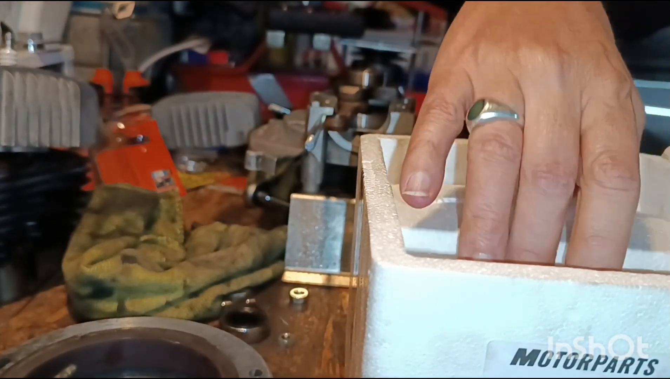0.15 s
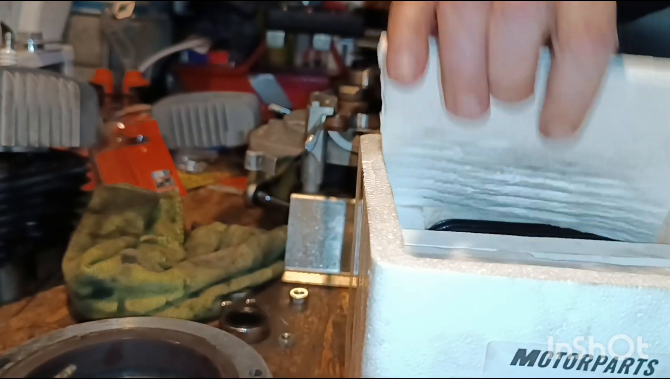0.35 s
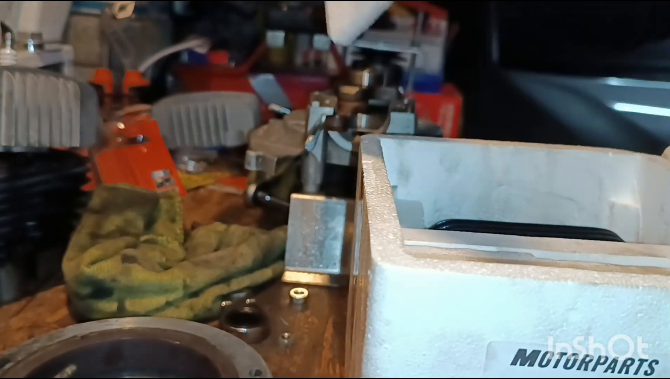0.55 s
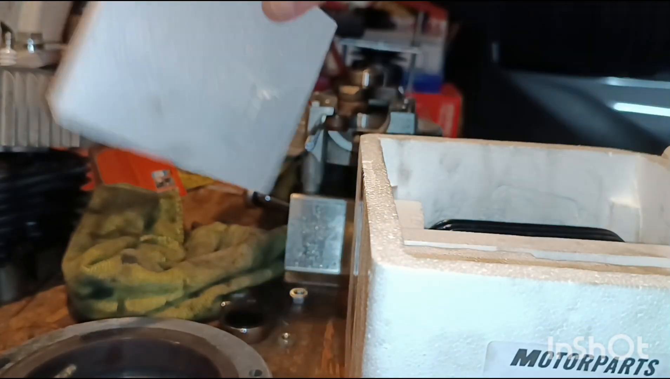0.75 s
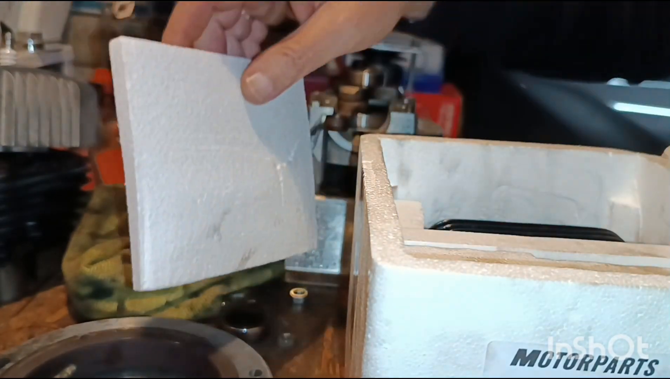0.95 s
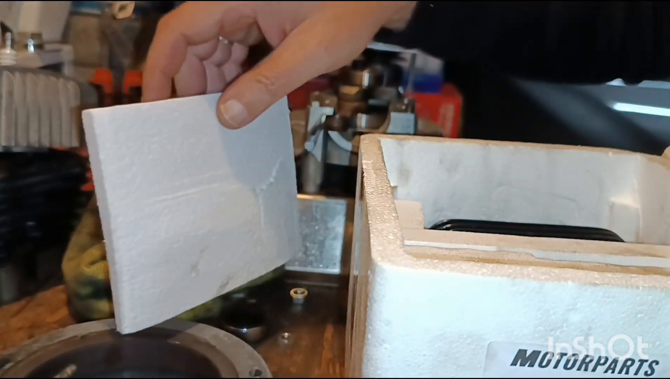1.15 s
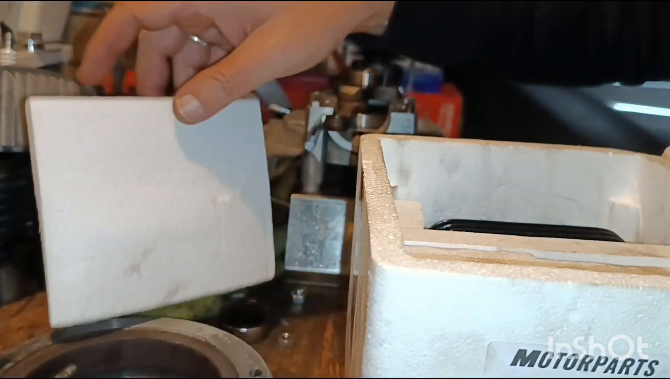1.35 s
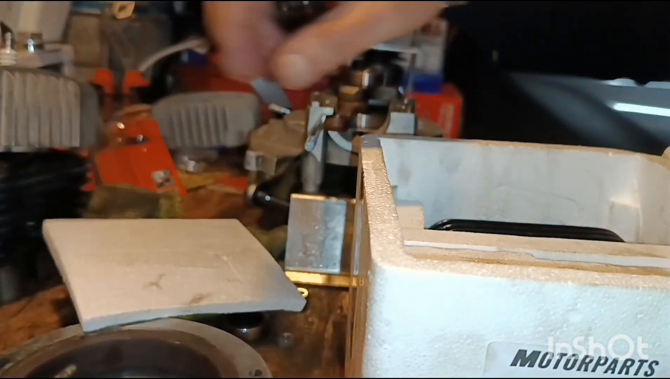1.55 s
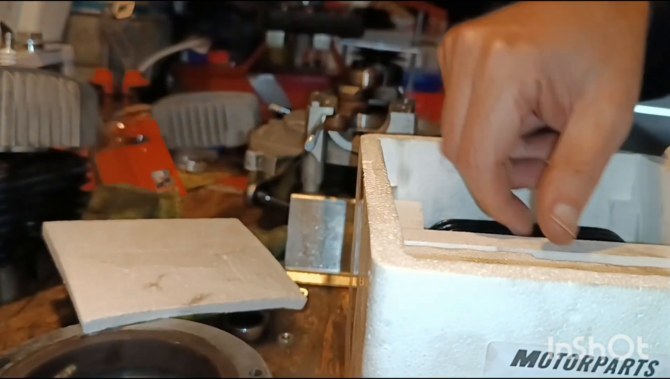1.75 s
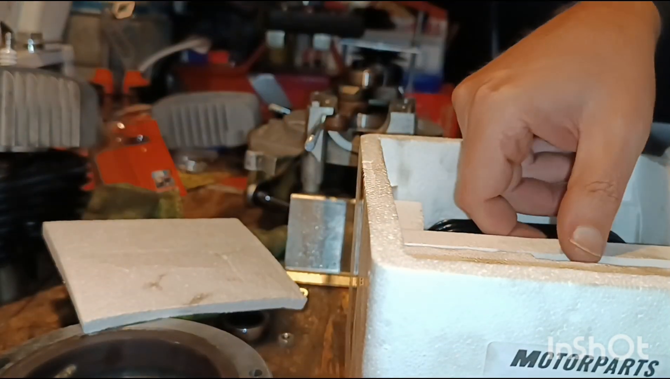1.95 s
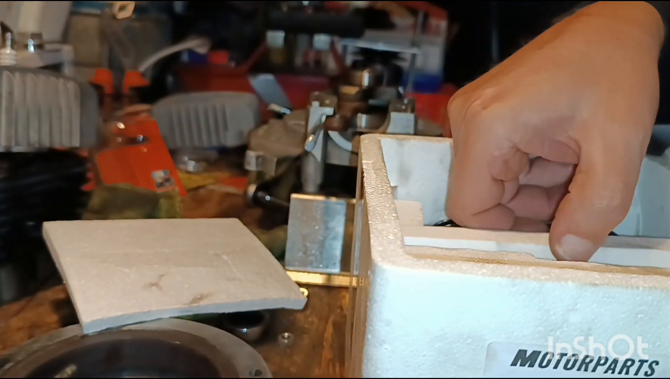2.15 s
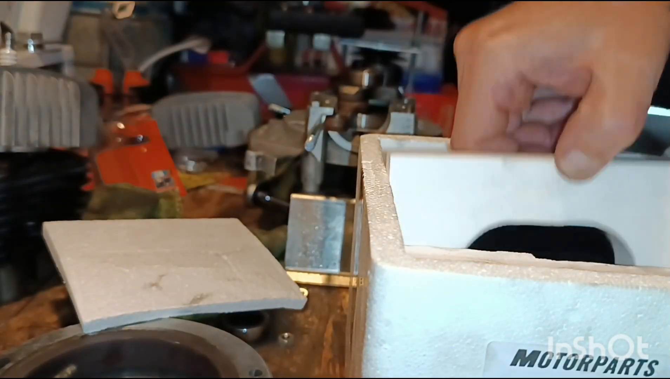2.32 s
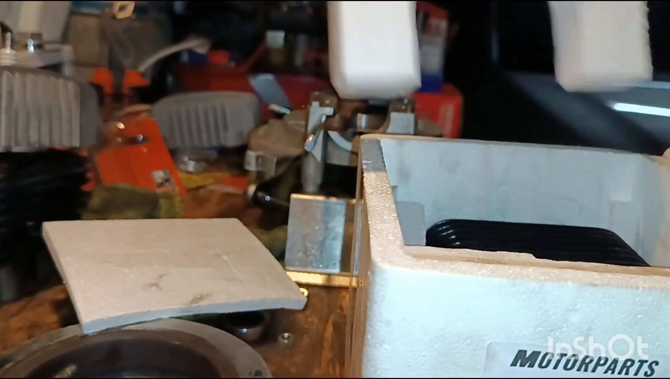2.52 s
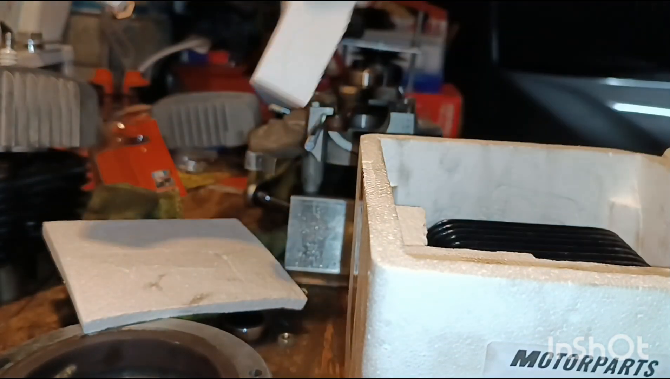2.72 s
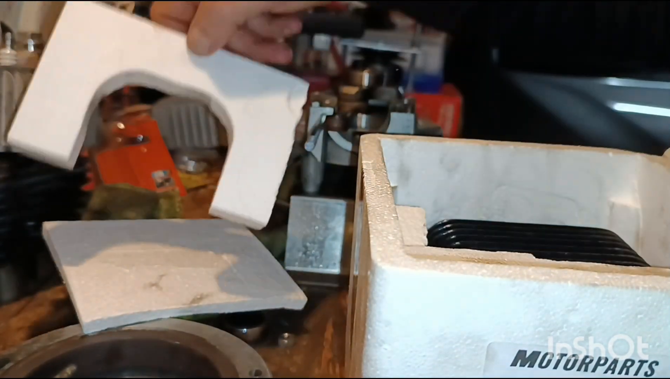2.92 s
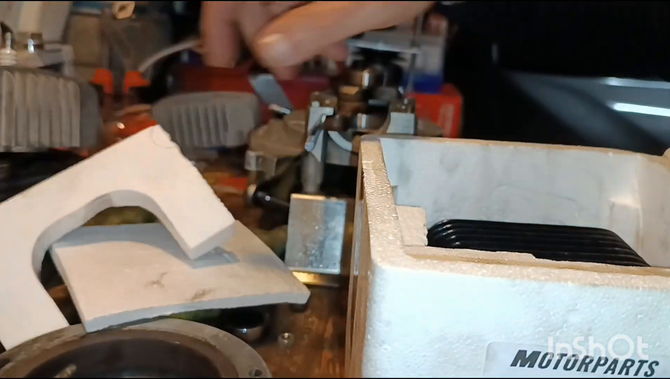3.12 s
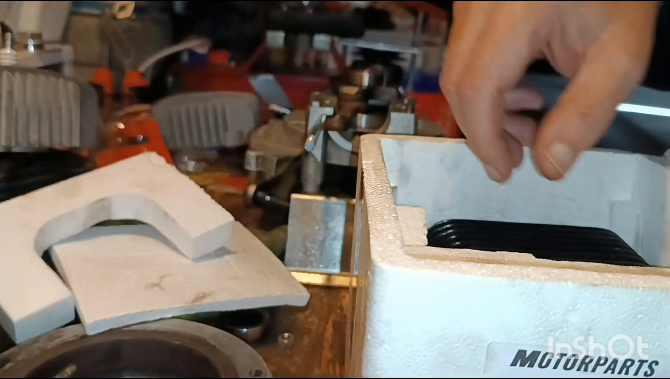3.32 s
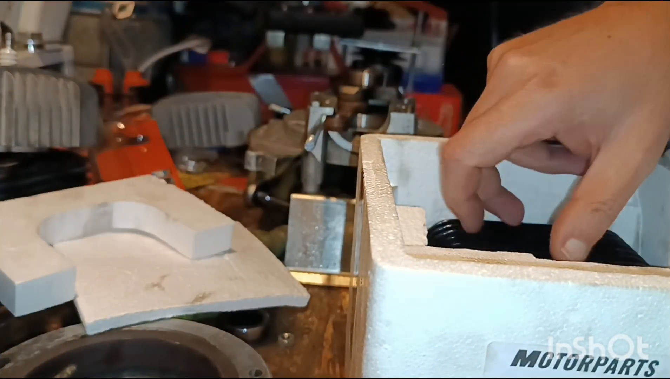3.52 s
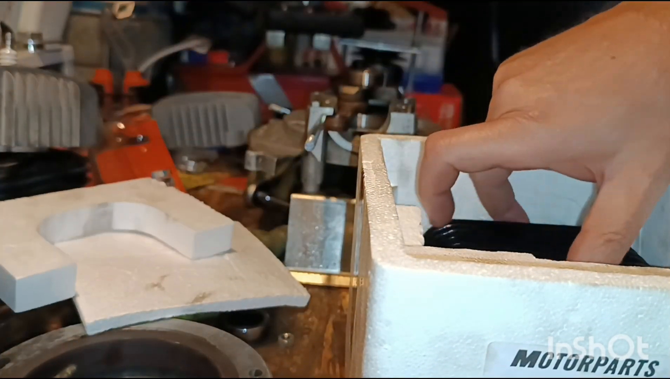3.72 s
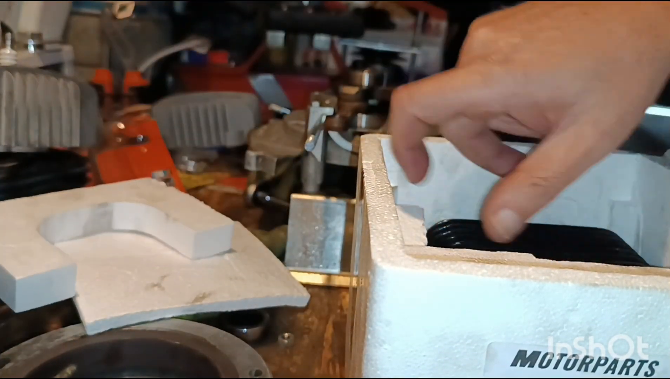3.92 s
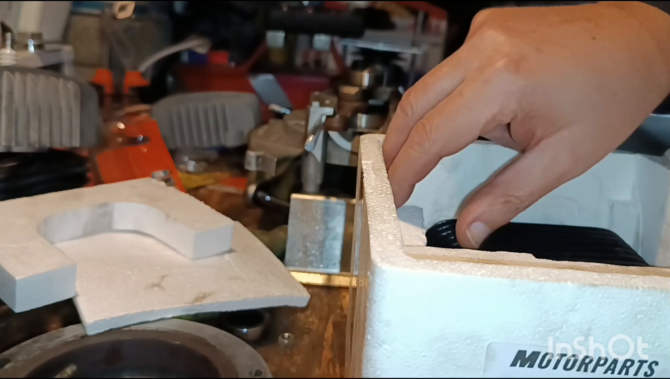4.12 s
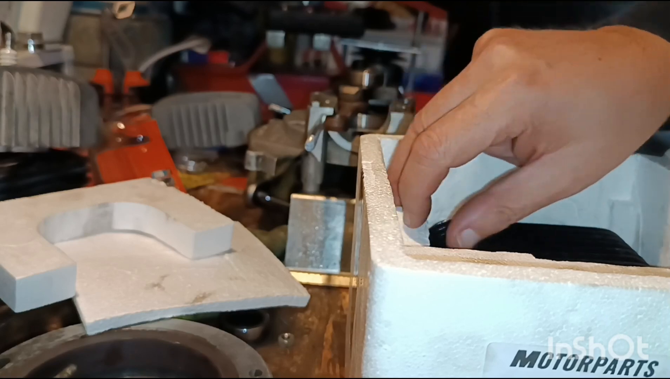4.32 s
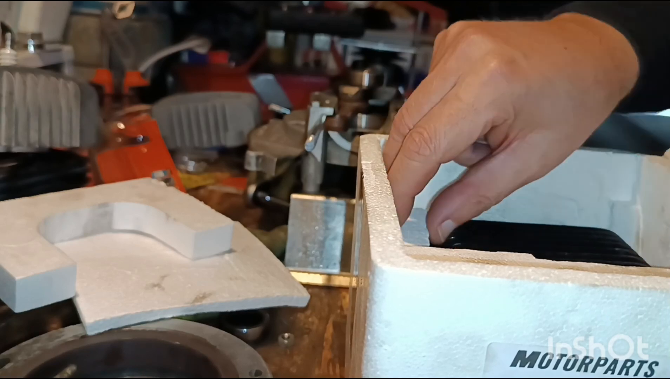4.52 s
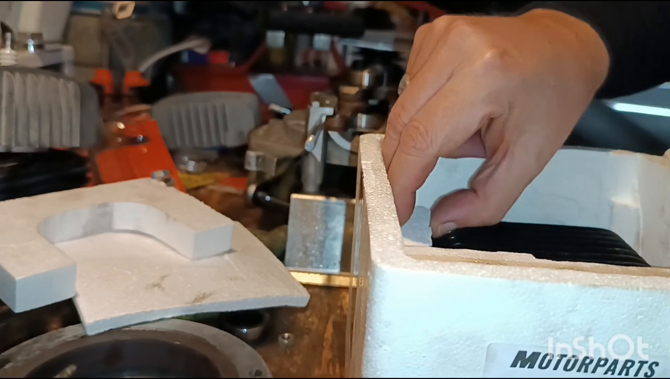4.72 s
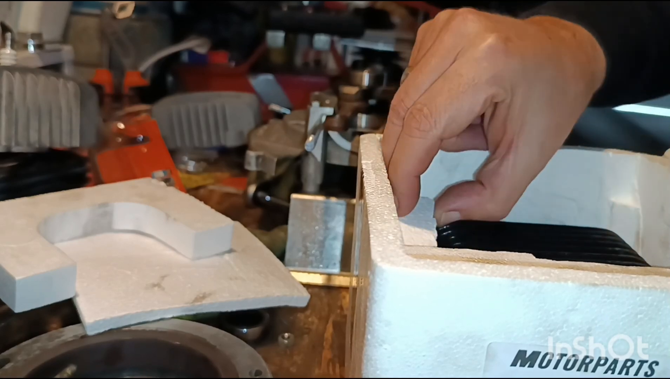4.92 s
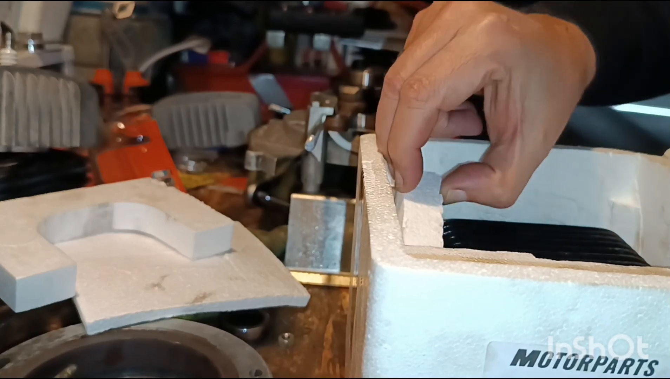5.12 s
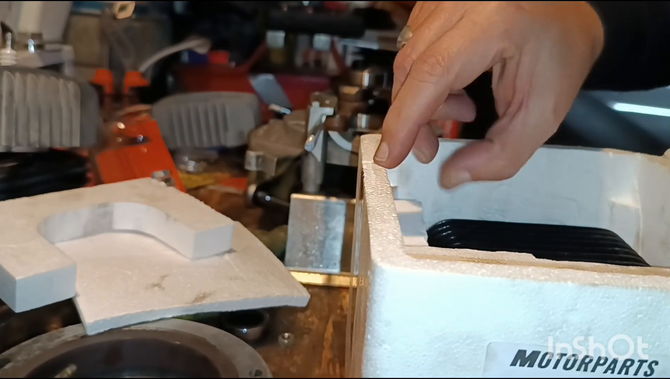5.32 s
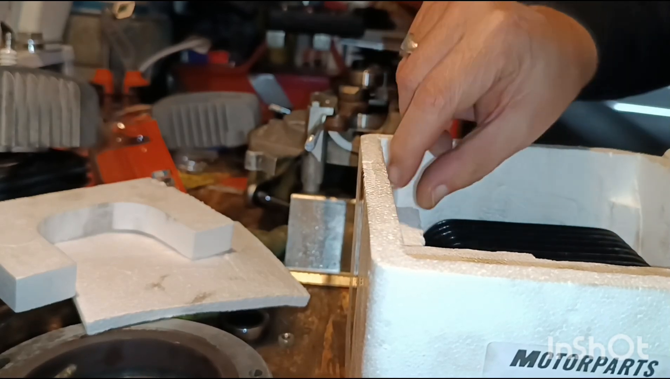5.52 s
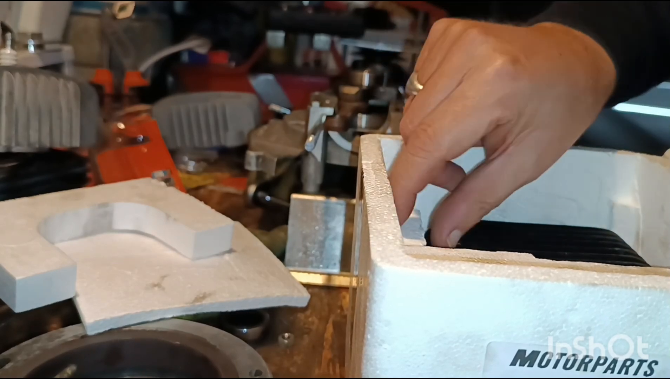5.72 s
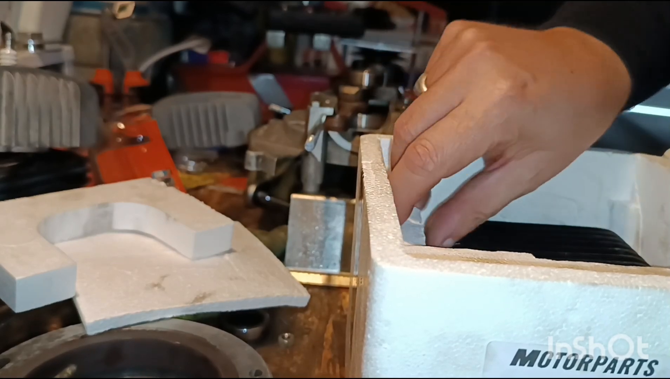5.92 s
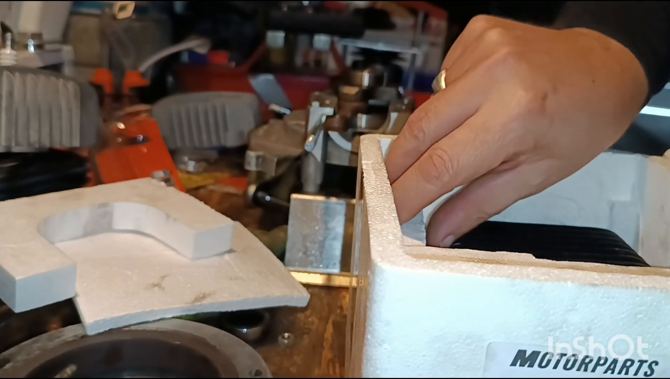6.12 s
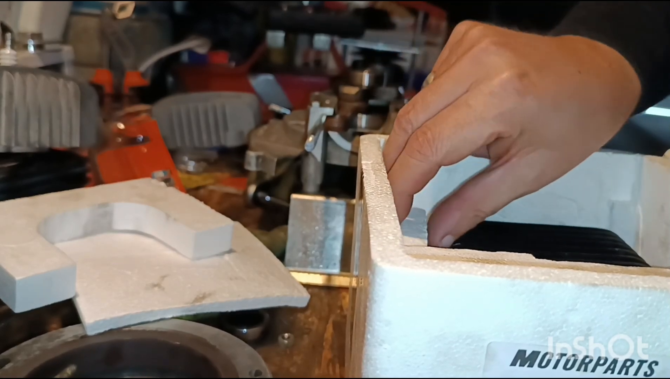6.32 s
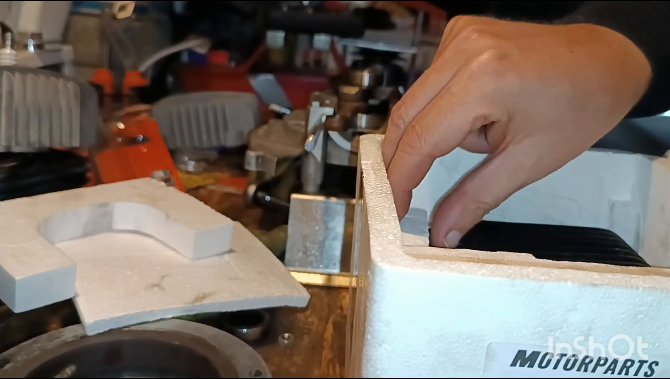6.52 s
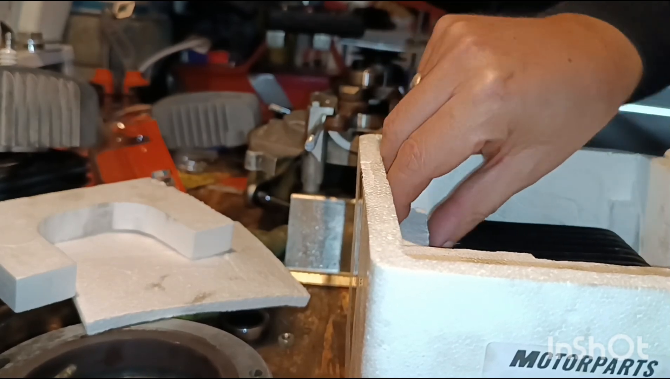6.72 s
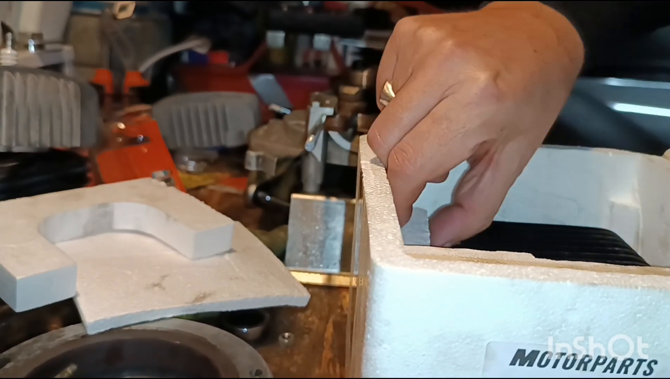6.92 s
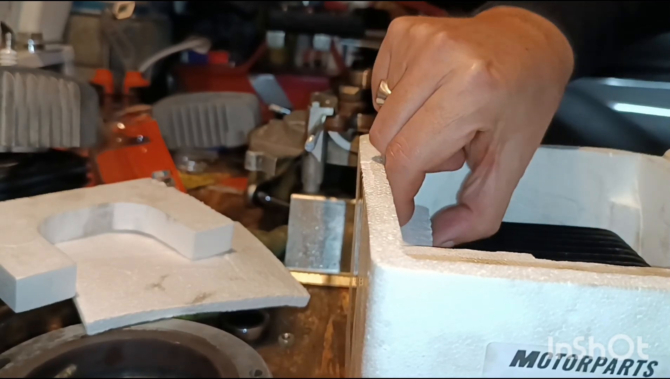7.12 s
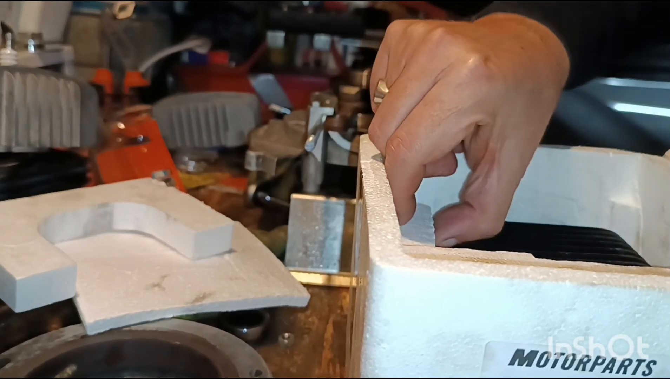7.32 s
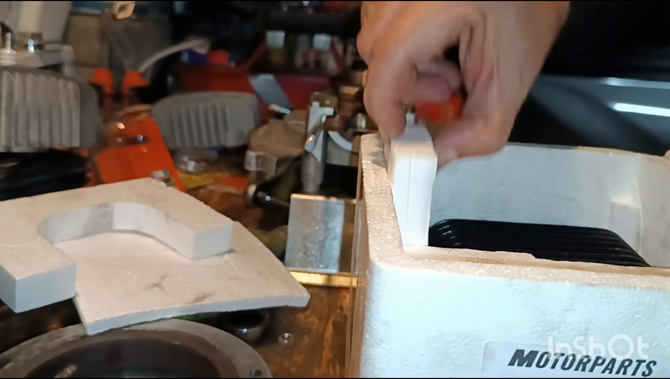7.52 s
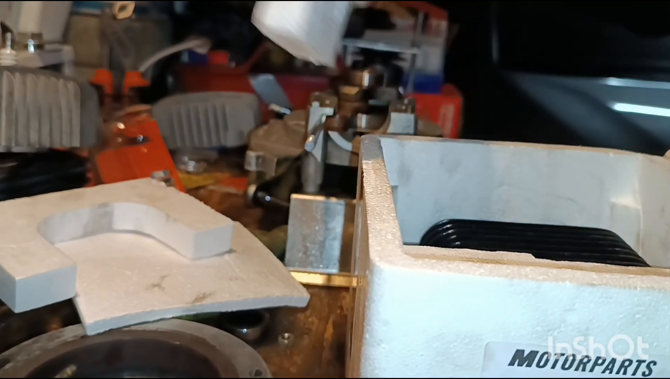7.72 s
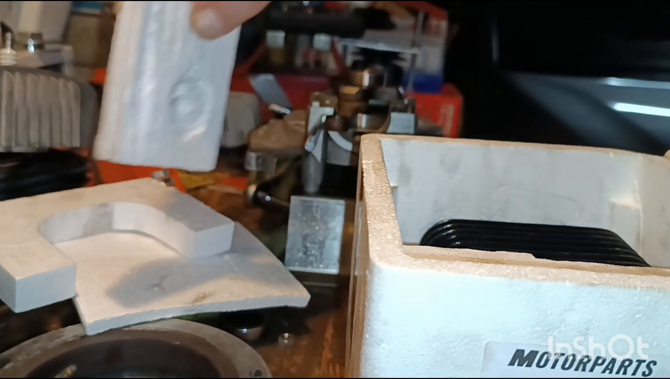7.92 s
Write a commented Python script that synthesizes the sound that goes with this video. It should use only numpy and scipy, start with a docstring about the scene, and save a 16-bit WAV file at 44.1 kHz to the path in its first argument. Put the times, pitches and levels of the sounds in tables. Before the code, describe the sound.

Foam scrapes and creaks against foam as fingers work pieces out of a box, and loose pieces land softly on a bench.

```python
"""Hands pull a foam piece out of a foam box in a workshop. Foam beads scrape on foam: they hiss,
the walls scratch and the hollow box booms. At 1.5 s a loose sheet drops on the bench. A second
piece squeaks as it is pulled out and lands at 3.1 s, and a metal part on the bench rings.
Fingers rub and tap the foam until a last long pull at 7.5 s. Behind it all the room
hisses faintly, traffic rumbles and a distant engine comes and goes."""
import sys
import numpy as np
from scipy import signal
from scipy.fft import rfft, irfft, next_fast_len
from scipy.io import wavfile

SR = 44100
rng = np.random.default_rng(int(sys.argv[2]) if len(sys.argv) > 2 else 0)


def to_wav(s):
    """Save 16-bit WAV."""
    ch = np.atleast_2d(s).T  # columns
    pcm = np.round(np.clip(ch, -1, 1) * 32767)  # PCM
    wavfile.write(sys.argv[1], SR, pcm.astype(np.int16))


N = 355248

# the notes at which the foam walls ring: (pitch [Hz], width [Hz], level [dB])
WALL_RINGS = [(1094, 106, 1.5), (1472, 142, 1.5), (1732, 270, -0.5), (2108, 278, 6), (2354, 510, 0.5),
              (2950, 277, -0.5), (3334, 238, -2.5), (4580, 1380, -17.5)]


def foam(scratch_follows_hiss=0.62):
    """Sliding, rubbing, pulling and tapping shake the beads, the walls and the air in the box."""
    # light steady touch of the hand: (time [s], bead hiss [dB], box boom [dB])
    sliding = [(0.0, -62.5, -62.5), (0.22, -62, -76), (0.38, -56, -36.5), (0.62, -69, -75),
               (1.79, -75.5, -69), (2.42, -43.5, -43), (2.78, -77, -79.5), (3.61, -69, -66.5),
               (4.03, -79, -64.5), (4.31, -48.5, -50), (4.75, -59.5, -58), (5.27, -67.5, -54),
               (5.47, -97, -62), (5.83, -57, -49), (7.44, -75, -63.5), (7.64, -60, -49), (7.85, -62, -81),
               (8.05, -78, -79)]
    # where the hand works: (time [s], left over right [dB])
    hand_position = [(0.0, -1), (1.5, 2.5), (2.5, -0.7), (3.1, 4.5), (4.0, 0.5), (6.0, -0.5), (7.8, -0.4)]
    # tone of the scraping beads: (frequency [Hz], level [dB])
    bead_tone = [(2350, -31.5), (4000, -2), (5610, -1.5), (6410, -5.5), (7190, -5), (8060, -7.5),
                 (11300, -3), (12500, 4.5), (15800, 0.5)]
    # the low notes of the box: (pitch [Hz], width [Hz], level [dB])
    box_rings = [(165, 55, -6.5), (300, 70.4, -0.5), (340, 48.6, 1), (457, 74, 1), (667.6, 84, -6),
                 (798, 370, -12)]
    # broad bands of a knock that hardly rings: (centre [Hz], width [Hz], level [dB])
    knock_bands = [(1130, 880, 0), (2280, 770, 0), (4100, 2300, -2)]
    hiss_db, boom_db = in_time(sliding)
    scratch_db = 1.5 + scratch_follows_hiss * hiss_db + (1 - scratch_follows_hiss) * boom_db
    rub_hiss, rub_scratch, creak, rub_boom = rubs()
    pull_hiss, pull_scratch, pull_boom, sheen_db = pulls()
    (crack, dull_knock, bright_knock, tap_boom), tap_notes = taps()
    # beads catch and let go, so the force shakes at two speeds
    judder = from_db(drift(21) + 0.74 * drift(150) - 2)
    hiss = (rub_hiss + pull_hiss + stereo_noise(alike=0.055) * from_db(hiss_db)) * judder + crack
    scratch = (rub_scratch + pull_scratch + stereo_noise(alike=0.064) * from_db(scratch_db)) * judder
    walls = ring(scratch + from_db(-22.5) * dull_knock, WALL_RINGS)
    boom_force = (rub_boom + from_db(-5.5) * pull_boom + from_db(boom_db)) * judder
    boom = stereo_noise(alike=0.43) * boom_force
    boom *= from_db(3.22 * drift(31) - 2.5)   # the box is pushed in separate lumps
    click = np.r_[1., np.zeros(N - 1)]
    beads = colour(hiss, bead_tone) / np.sqrt(np.sum(colour(click, bead_tone) ** 2))
    sheen = colour(beads, [(8000, -30), (12500, 0), (16000, -3)])   # the highest part of the hiss
    knocks = (ring(dull_knock, knock_bands[:1]) + ring(bright_knock, knock_bands[1:])) / np.sqrt(2)
    surface = beads + (from_db(sheen_db) - 1) * sheen + walls + creak * judder + from_db(-2.5) * knocks
    # sliding makes the air in the box sing one note
    air_push = stereo_noise(alike=0.76) * (pull_boom + from_db(boom_db - 11))
    air_note = from_db(-4) * ring(air_push, [(455.4, 36.6, 0)])
    box = ring(boom + tap_boom, box_rings) + air_note + tap_notes
    return surface * left_right(in_time(hand_position)[0]) + box


def pulls(edge_s=0.038, resting_sheen_db=-8.0):
    """A piece scrapes out of its tight seat; the highest hiss, its sheen, grows until it comes free."""
    # one list for each pull: (time [s], bead hiss [dB], wall scratch [dB], box boom [dB])
    scrapes = [
        [(0.2, -62, -68, -58), (0.212, -46.5, -46.5, -36.5), (0.276, -48.5, -52, -60), (0.296, -41, -41, -38),
         (0.316, -40.5, -55, -49), (0.366, -42.5, -44.5, -41), (0.434, -33, -42, -47), (0.46, -37.5, -47, -32),
         (0.466, -38, -35.5, -25.5), (0.528, -44, -56, -60), (0.54, -77, -60, -58)],
        [(2.27, -41, -56, -37.5), (2.302, -40, -49, -57), (2.346, -36, -44.5, -44), (2.432, -39, -52, -43.5),
         (2.446, -36, -47, -42), (2.472, -33, -41.5, -30.5), (2.498, -32.5, -39, -36), (2.516, -37, -43, -35),
         (2.53, -45, -56, -49), (2.55, -41, -58, -46.5), (2.562, -35, -52, -26.5), (2.576, -48, -73, -41)],
        [(7.45, -67, -50.5, -44), (7.464, -34, -36, -38), (7.478, -28.5, -39, -45.5), (7.512, -33, -45.5, -41),
         (7.534, -30.5, -34.5, -51), (7.552, -32, -36, -28), (7.566, -29.5, -43, -37.5), (7.58, -36, -37, -34),
         (7.606, -36, -44, -52), (7.644, -30.5, -41.5, -40.5), (7.672, -31, -42, -37.5),
         (7.686, -30, -40.5, -30), (7.71, -28, -40, -28.5), (7.728, -27, -38, -24.5), (7.742, -68, -56, -41)],
    ]
    middle_sheen_db, sheen_rise_db = (-5.5, 1, -3.5), (7, 16.5, 8)
    t = np.arange(N) / SR
    levels, sheen_db = np.zeros((3, N)), np.full(N, resting_sheen_db)
    for rows, middle_db, rise_db in zip(scrapes, middle_sheen_db, sheen_rise_db):
        start, end = rows[0][0], rows[-1][0]
        fade = np.clip(np.minimum(t - start, end - t) / edge_s + .5, 0, 1)
        levels += fade * from_db(in_time(rows))
        along = (t - start) / (end - start) - .5
        sheen_db += fade * (middle_db + rise_db * along - resting_sheen_db)
    grains = box_echoes(bead_noise(snap_db=12)[:N]) + rng.standard_normal((2, N))
    grains *= from_db(1.3 * drift(65))   # the tight fit sticks and slips
    hiss, scratch, boom = levels
    return grains * hiss, grains * scratch, boom, sheen_db


def rubs(edge_s=0.0086, edge_share=0.25, arch_db=2.0, fade_db=-0.5, creak_width_hz=111):
    """Each short finger rub scrapes the beads and creaks at one of the wall's notes."""
    # finger rubs: (time [s], length [s], bead hiss [dB], wall scratch [dB], box boom [dB])
    strokes = [(0.182, 0.046, -59, -56, -47), (0.566, 0.034, -48, -50.5, -58),
               (0.669, 0.061, -49, -56, -84), (0.764, 0.085, -55, -62, -70),
               (0.826, 0.048, -48, -59.5, -74), (0.967, 0.03, -59, -60, -78),
               (1.025, 0.062, -54.5, -52, -62.5), (1.095, 0.15, -56, -57, -64.5),
               (1.28, 0.09, -63.5, -69, -80), (1.861, 0.032, -45.5, -51.5, -45),
               (1.937, 0.032, -58, -53.5, -67), (1.971, 0.096, -49.5, -51, -54.5),
               (2.086, 0.068, -57, -52.5, -50.5), (2.212, 0.045, -53, -76, -71),
               (2.613, 0.041, -56, -53, -82), (2.666, 0.018, -52, -62, -58),
               (2.697, 0.055, -61.5, -64.5, -65), (2.991, 0.031, -64.5, -71, -99),
               (3.073, 0.051, -40, -49, -45.5), (3.141, 0.069, -42, -47.5, -47),
               (3.214, 0.03, -48.5, -52, -50.5), (3.48, 0.062, -57.5, -58.5, -66),
               (3.555, 0.081, -52.5, -57, -66), (3.633, 0.089, -59.5, -60, -57.5),
               (3.709, 0.072, -48, -51, -47), (3.851, 0.035, -64, -59, -59),
               (3.892, 0.031, -44.5, -46, -48), (4.073, 0.045, -44, -46.5, -49.5),
               (4.138, 0.025, -43, -42, -34.5), (4.192, 0.023, -46, -51, -46),
               (4.22, 0.073, -39.5, -45, -45), (4.329, 0.041, -35.5, -40.5, -56),
               (4.388, 0.03, -49, -48, -56), (4.424, 0.032, -47, -46.5, -45), (4.473, 0.013, -43, -57, -37),
               (4.507, 0.027, -49.5, -55, -54), (4.62, 0.068, -43.5, -48, -55),
               (4.768, 0.057, -43.5, -43.5, -50), (4.88, 0.047, -46.5, -46.5, -45),
               (4.907, 0.055, -33.5, -37.5, -44), (5.008, 0.077, -46.5, -44, -44.5),
               (5.081, 0.086, -33, -36, -44.5), (5.217, 0.043, -32, -33, -36.5),
               (5.257, 0.032, -25.5, -34, -38), (5.33, 0.019, -41, -50, -71), (5.361, 0.014, -43, -39, -42),
               (5.422, 0.038, -36, -43, -37.5), (5.609, 0.072, -39.5, -36.5, -39.5),
               (5.68, 0.077, -45, -49, -56), (5.751, 0.041, -53.5, -45, -45),
               (5.788, 0.098, -48.5, -46.5, -55), (5.882, 0.013, -35.5, -42, -43.5),
               (5.94, 0.02, -41, -47, -70), (5.961, 0.036, -47, -47.5, -48),
               (5.998, 0.032, -30, -35.5, -44.5), (6.043, 0.095, -48.5, -49, -64),
               (6.162, 0.062, -48, -47, -62), (6.248, 0.032, -41.5, -47.5, -66),
               (6.285, 0.049, -49, -48.5, -58), (6.316, 0.013, -42, -40.5, -46.5),
               (6.44, 0.036, -76, -59, -53), (6.477, 0.041, -47, -41.5, -44), (6.52, 0.04, -76, -91, -50.5),
               (6.616, 0.11, -91, -67, -50), (6.728, 0.11, -49.5, -52.5, -49.5),
               (6.806, 0.013, -30, -34.5, -44), (6.841, 0.036, -54, -54, -55), (6.89, 0.042, -54, -56, -53),
               (6.984, 0.039, -72, -55.5, -69), (7.083, 0.032, -64, -64, -91),
               (7.131, 0.081, -53.5, -51, -46), (7.262, 0.02, -71, -59.5, -52),
               (7.348, 0.034, -60, -54.5, -52), (8.037, 0.023, -62, -70, -64)]
    hiss, scratch, creak, boom = np.zeros((4, 2, N + SR))
    gritty, smooth = bead_noise(snap_db=14), rng.standard_normal((2, N + SR))
    notes = rng.choice([2, 3, 3, 4, 6], len(strokes))
    for (start, length, hiss_db, scratch_db, boom_db), note in zip(strokes, notes):
        t = np.arange(int((length + 0.055) * SR)) / SR - .02
        along = t / length - .5
        edges = np.clip(np.minimum(t, length - t) / (edge_s + edge_share * length) + .5, 0, 1) ** 2
        # the hand speeds up, then slows down
        shape = edges * from_db(fade_db * along - arch_db * (3.6 * along ** 2 - 0.74))
        first = round((start - .02) * SR)
        span = slice(first, first + len(t))
        grains = box_echoes(gritty[span] * shape) + from_db(-4.5) * smooth[:, span] * shape
        hiss[:, span] += from_db(hiss_db) * grains
        scratch[:, span] += from_db(scratch_db) * grains
        wall_note = ring(grains, [(WALL_RINGS[note][0], creak_width_hz, 0)])
        creak[:, span] += from_db(scratch_db - 9.5) * wall_note
        boom[:, span] += from_db(boom_db) * shape
    return hiss[:, :N], scratch[:, :N], creak[:, :N], boom[:, :N]


def taps(rise_s=0.001, click_db=13, sheet_beat_hz=28, bench_hz=150):
    """Each tap or drop is a click and a dying rattle in the beads, walls and box,
    plus a short ringing note: mostly a low thud, at 4.27 s a creak near 1 kHz."""
    # taps, drops and snaps: (time [s], crack [dB], wall knock [dB], knock brightness [dB],
    # note level [dB], note pitch [Hz], time for the rattle to fade by 60 dB [s])
    hits = [(0.1884, -41.5, -36.5, -3, -41, 268, 0.064), (0.291, -50, -36.5, -7, -35, 141, 0.076),
            (0.338, -38, -37.5, -8.7, -35, 290, .04), (0.369, -36, -35, -5, -42, 300, 0.031),
            (0.418, -43, -43, 3, -50, 300, .035), (0.453, -35, -34, 0.1, -26.5, 278, .04),
            (0.4664, -39, -31, -13.5, -23, 298, 0.037), (0.484, -55, -39, -6, -29, 480, 0.034),
            (1.454, -37.5, -42.5, -3.5, -34, 284, 0.05), (1.5262, -44.5, -47.5, 7, -42, 302, 0.053),
            (1.6301, -42.5, -51, -9.5, -42.5, 274, 0.067), (1.856, -50, -57, 14, -66, 304, 0.035),
            (1.879, -58, -46, 2, -40.5, 450, .03), (2.1167, -53, -45.5, -10.2, -39.5, 433, 0.057),
            (3.0716, -33, -27.5, -5, -26, 325, 0.048), (3.0795, -35, -32, -5, -34, 249, 0.03),
            (3.1669, -37, -55, 0, -36, 165, 0.034), (3.3552, -63, -31, -0.5, -69, 162, 0.032),
            (3.4022, -61, -32.5, 1.5, -69, 188, 0.04), (3.4232, -66, -38.5, -1.5, -58, 113, 0.025),
            (3.902, -47, -44, -5, -42, 294, 0.042), (3.915, -60, -49, -5, -33, 268, 0.026),
            (4.0196, -47, -53.5, 2.5, -44, 148, 0.058), (4.1293, -50, -52, 4, -35.5, 290, 0.018),
            (4.1964, -55, -51, 0.1, -37, 166, 0.054), (4.2438, -29.5, -45, 0.1, -29, 255, 0.036),
            (4.274, -51, -38, -6, -34, 1030, 0.034), (4.4575, -59, -30.5, -4, -25.5, 244, 0.023),
            (4.5431, -52, -51, -3, -40, 280, 0.035), (5.228, -50, -32, 2, -40, 490, .03),
            (5.272, -19.5, -44, 0.1, -29.5, 178, 0.026), (5.3816, -49, -36, -6, -25.5, 342, 0.11),
            (5.433, -48, -41, -6, -37, 360, 0.14), (5.4684, -68, -56, -12, -34, 319, 0.072),
            (5.6069, -39, -42.5, -10, -31, 475, 0.041), (6.0057, -30.5, -45, -9, -42, 235.4, 0.1),
            (6.026, -50, -54, -11, -36, 200, 0.033), (6.388, -60, -42.5, -8.5, -47, 302, 0.055),
            (6.4043, -62, -45.5, -4.5, -44, 410, 0.038), (6.454, -70, -53.5, -9.5, -40, 455, .03),
            (6.6172, -65, -34, -6.5, -46, 344, 0.04), (6.6444, -96, -33.5, -4, -52, 340, 0.038),
            (6.6856, -53, -32, -7, -44, 332, 0.045), (6.7655, -64, -40.5, -8, -55, 302, 0.021),
            (6.8114, -23, -30, 0.1, -35.5, 144, 0.018)]
    pushes, notes = np.zeros((4, 2, N)), np.zeros(N)
    noise = rng.standard_normal(N)
    t = np.arange(int(.25 * SR)) / SR
    for start, crack_db, knock_db, bright_db, note_db, note_hz, rattle_s in hits:
        first = round(start * SR)
        span = slice(first, first + len(t))
        # the loose sheet lands away from the box, rings longer and wobbles as two close notes beat
        is_sheet = 1.4 < start < 1.7
        boom_db, ring_s, wobble = (-12.5, 0.19, 0.32) if is_sheet else (-2.5, 0.069, 0)
        # most of the force comes in the first moments
        fall = from_db(-60 * t / rattle_s) + from_db(4 - 60 * t / 0.0088)
        push = noise[span] * (1 - np.exp(-t / rise_s)) * fall
        push[0] = from_db(click_db)
        levels = from_db([crack_db, knock_db - bright_db, knock_db + bright_db])
        pushes[:3, :, span] += levels[:, None, None] * box_echoes(push, echo_s=.0015, direct=3.0)
        pushes[3, :, span] += from_db(note_db + boom_db) * push
        # the whole piece bends back and forth over one short shove on the bench
        bend = from_db(-60 * t / ring_s) * np.sin(2 * np.pi * note_hz * t)
        bend *= 1 + wobble * np.cos(2 * np.pi * sheet_beat_hz * t)
        shove = from_db(-0.5 - 60 * t / 0.024) * np.sin(2 * np.pi * bench_hz * t)
        notes[span] += from_db(note_db) * (1 - np.exp(-t / 0.0017)) * (bend + shove)
    return pushes, notes


def bead_noise(snap_db, snaps_per_s=300):
    """The noise of beads rubbing; here and there one snaps loose."""
    noise = rng.standard_normal(N + SR)
    snaps = rng.random(N + SR) < snaps_per_s / SR
    return unit_level(noise * (1 + from_db(snap_db) * snaps))


def box_echoes(noise, echo_s=.004, direct=.8, count=14):
    """A noise reaches each microphone directly and by quick echoes inside the box."""
    paths = np.zeros((2, int(0.069 * SR)))
    delays = np.minimum(rng.exponential(echo_s, (2, count)) * SR, paths.shape[1] - 1).astype(int)
    for side in range(2):
        strengths = rng.normal(0, 1, count) * np.exp(-delays[side] / SR / 0.017)
        np.add.at(paths[side], delays[side], strengths)
    paths[:, 0] += direct
    paths /= np.sqrt(np.sum(paths ** 2, axis=1, keepdims=True))
    return signal.fftconvolve(noise[None], paths, axes=1)[:, :len(noise)]


def squeak(octave_db=12):
    """Foam sticks and slips so fast that it whistles; below 8 kHz a louder octave joins in."""
    # the main whistle: (time [s], pitch [Hz], level [dB])
    whistle = [(2.272, 12500, -80.5), (2.283, 9720, -55), (2.292, 7000, -53), (2.299, 7300, -42),
               (2.3045, 7800, -43.5), (2.3055, 8360, -35), (2.315, 8380, -31.5), (2.318, 13480, -40.5),
               (2.323, 14500, -60.5)]
    hz, level_db = in_time(whistle)
    phase = 2 * np.pi * np.cumsum(hz * (1 + 0.031 * drift(900))) / SR
    t = np.arange(N) / SR
    sounding = (t > whistle[0][0]) & (t < whistle[-1][0])
    octave = from_db(octave_db) * (hz < 8000) * np.sin(2 * phase)
    return sounding * from_db(level_db) * (np.sin(phase) + octave)


def metal_part(pitch_hz=2145, beat_hz=45, ring_s=0.2):
    """A metal part on the bench rings after each jolt; its close notes beat, so it wobbles."""
    # jolts of the part: (time [s], level [dB])
    jolts = [(3.105, -50), (3.184, -43), (3.285, -53)]
    sound = np.zeros(N)
    for start, db in jolts:
        t = np.arange(N) / SR - start
        tone = np.sin(2 * np.pi * pitch_hz * t) * (1 + 0.65 * np.cos(2 * np.pi * beat_hz * t))
        sound += (t > 0) * from_db(db - 60 * np.abs(t) / ring_s) * tone
    return sound


def room_echo(sound, fade_s=0.34, level_db=-15, treble_cut_hz=7500):
    """The workshop walls send back many echoes that soon die away."""
    t = np.arange(int(.6 * SR)) / SR
    echoes = rng.standard_normal((2, len(t))) * from_db(-60 * t / fade_s) * (t > .004)
    shared, apart = signal.lfilter(*signal.butter(1, treble_cut_hz, fs=SR), echoes)
    # low sounds reach both microphones alike
    apart = signal.lfilter(*signal.butter(2, 500, "high", fs=SR), apart)
    echoes = shared + apart * [[1], [-1]]
    echoes /= np.sqrt(np.sum(echoes ** 2, axis=1, keepdims=True))
    return from_db(level_db) * signal.fftconvolve(sound, echoes, axes=1)[:, :N]


def engine(fade_s=0.15):
    """A distant engine hums a wavering tone, first higher and later lower."""
    # the lower and the higher hum: (time [s], pitch [Hz], level [dB])
    low_hum = [(3.25, 68.8, -59), (3.4, 60.5, -59.5), (4.54, 62.6, -59.5), (4.84, 64.5, -52.5),
               (5.24, 63.6, -45.5), (5.85, 66.5, -63.5), (6.28, 68.3, -57), (6.6, 67.5, -70)]
    high_hum = [(0.0, 98, -103), (0.37, 85, -48.5), (0.61, 89.6, -65.5), (1.22, 90.25, -51.5),
                (1.34, 92.5, -69), (1.59, 85, -66.5), (2.01, 84.5, -57.5), (2.42, 84.6, -61),
                (2.6, 82.4, -73)]
    t, sound = np.arange(N) / SR, np.zeros(N)
    for rows in (low_hum, high_hum):
        hz, level_db = in_time(rows)
        fade = np.clip(np.minimum(t - rows[0][0], rows[-1][0] - t) / fade_s, 0, 1)
        tone = np.sqrt(2) * np.sin(2 * np.pi * np.cumsum(hz) / SR)
        sound += fade * from_db(level_db + 1.7 * drift(8)) * tone
    return sound


def traffic(band_hz=(50, 120)):
    """Traffic makes a deep rumble that swells and sinks."""
    # strength of the rumble: (time [s], level [dB])
    swells = [(0.0, -60), (0.43, -58.5), (2.24, -62), (2.76, -84.5), (3.66, -71), (4.82, -61.5),
              (5.18, -64), (5.83, -66), (8.06, -57)]
    band = signal.butter(2, band_hz, "band", fs=SR, output="sos")
    return from_db(in_time(swells)[0]) * unit_level(signal.sosfilt(band, stereo_noise(alike=0.26)))


def room_hiss(level_db=-65):
    """The room's faint steady noise, strongest in the bass."""
    # tone of the room's noise: (frequency [Hz], level [dB])
    room_tone = [(18, -61.5), (30, -4), (93, 6), (178, -7), (232, -16.5), (318, -4.5), (581, -27),
                 (816, -14.5), (2040, -34), (7780, -39), (15800, -64)]
    return from_db(level_db) * unit_level(colour(stereo_noise(alike=0.2), room_tone))


def from_db(db):
    """Turn decibels into a number to multiply by."""
    return 10 ** (np.asarray(db) / 20)


def unit_level(x):
    """Scale a signal so that its average power is 1."""
    return x / np.sqrt(np.mean(x ** 2) + 1e-20)


def in_time(rows):
    """Join a table's points with straight lines: one signal for each column after the time."""
    times, *columns = np.transpose(rows)
    return [np.interp(np.arange(N) / SR, times, column) for column in columns]


def colour(x, points):
    """Change a sound's tone along a curve of (frequency [Hz], level [dB]) points."""
    hz, db = np.transpose(points)
    size = next_fast_len(N)
    grid_hz = np.maximum(np.arange(size // 2 + 1) * SR / size, 1)
    gain = from_db(np.interp(np.log(grid_hz), np.log(hz), db))
    return irfft(rfft(x, size) * gain, size)[..., :N]


def drift(rate_hz):
    """A smooth random wander, about 1 in size."""
    r = np.exp(-2 * np.pi * rate_hz / SR)
    return unit_level(signal.lfilter([1], [1, -2 * r, r * r], rng.standard_normal(N + SR))[SR:])


def resonate(x, hz, width_hz):
    """Ring at one note; the narrower it is, the longer it lasts."""
    r = np.exp(-np.pi * width_hz / SR)
    feedback = [1, -2 * r * np.cos(2 * np.pi * hz / SR), r * r]
    return signal.lfilter([(1 - r * r) / 2, 0, (r * r - 1) / 2], feedback, x)


def ring(x, notes):
    """Ring at several notes at once, every other one flipped; white noise keeps its level."""
    def all_notes(push):
        return sum((-1) ** k * from_db(db) * resonate(push, hz, width)
                   for k, (hz, width, db) in enumerate(notes))
    click = np.r_[1., np.zeros(SR // 8)]
    return all_notes(x + 1e-18) / np.sqrt(np.sum(all_notes(click) ** 2))


def stereo_noise(alike):
    """Left and right noise, the same when alike is 1, and always close in the bass."""
    shared, apart = rng.standard_normal((2, N))
    apart = signal.lfilter(*signal.butter(1, 220, "high", fs=SR), apart)
    return (np.sqrt(1 + alike) * shared + np.sqrt(1 - alike) * apart * [[1], [-1]]) / np.sqrt(2)


def left_right(left_over_right_db):
    """The two gains that place a sound to one side."""
    return from_db(np.array([left_over_right_db, -left_over_right_db]) / 2)


def scene():
    """The sounds at the bench and their echo, over the background."""
    near = foam() + squeak() + metal_part()
    return near + room_echo(near) + room_hiss() + traffic() + engine()


def record(dry, bass_cut_hz=59, treble_cut_hz=16300):
    """Two microphones, each with its own tone, lose the deepest bass and the highest treble."""
    # balance of the microphones: (frequency [Hz], left over right [dB])
    mic_balance = [(400, 0.5), (4000, -0.5), (8000, -3.5), (11000, 1.5), (15000, 10.5)]
    hz, db = np.transpose(mic_balance)
    mics = np.array([colour(dry[0], np.c_[hz, db / 2]), colour(dry[1], np.c_[hz, -db / 2])])
    mics = signal.sosfilt(signal.butter(2, bass_cut_hz, "high", fs=SR, output="sos"), mics)
    return signal.sosfilt(signal.cheby2(16, 70, treble_cut_hz, fs=SR, output="sos"), mics)


dry = scene()
out = record(dry)
to_wav(out)
```